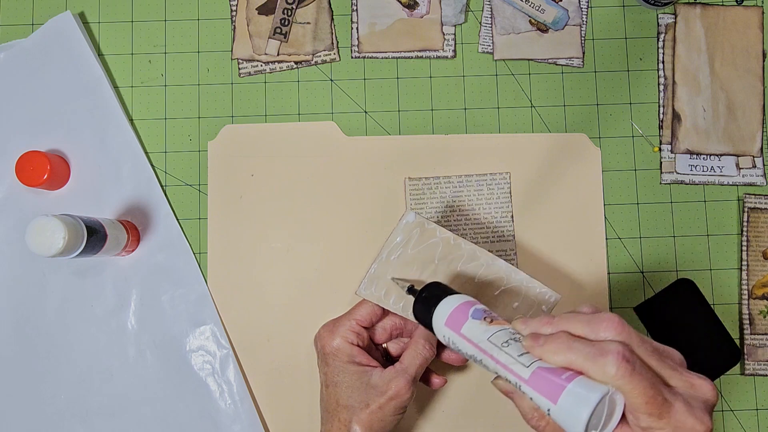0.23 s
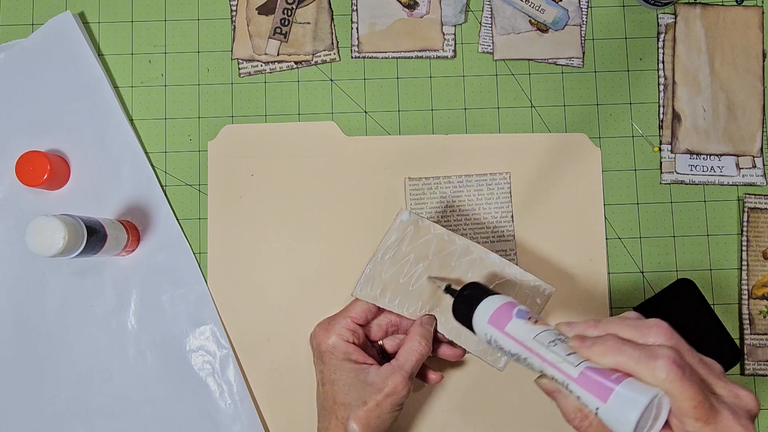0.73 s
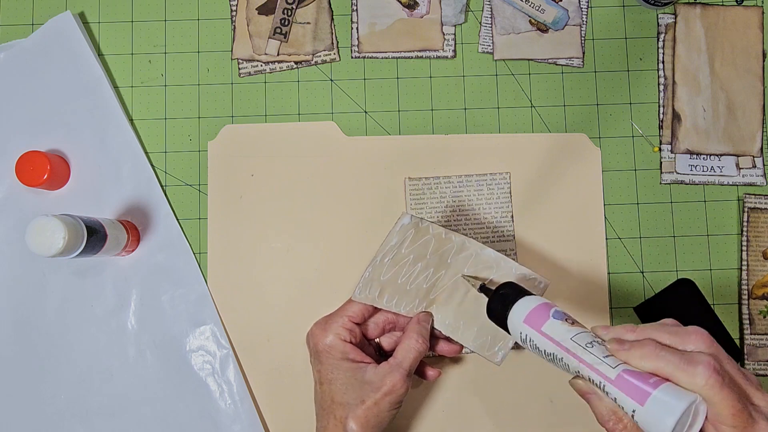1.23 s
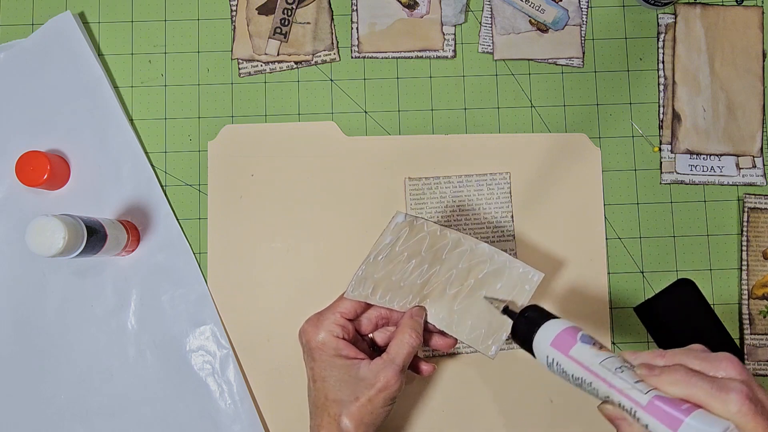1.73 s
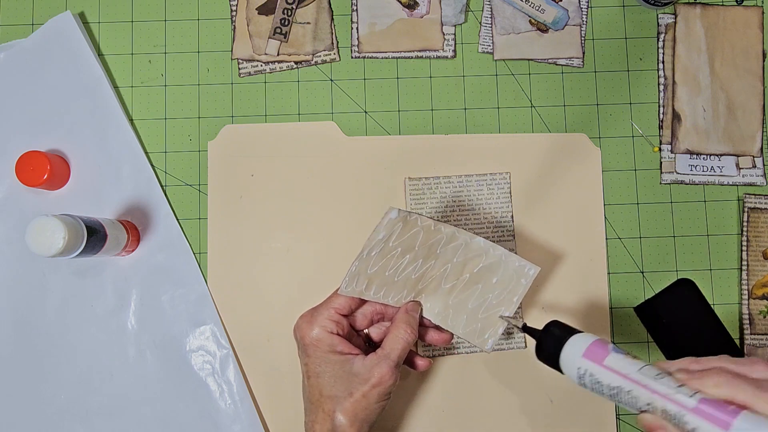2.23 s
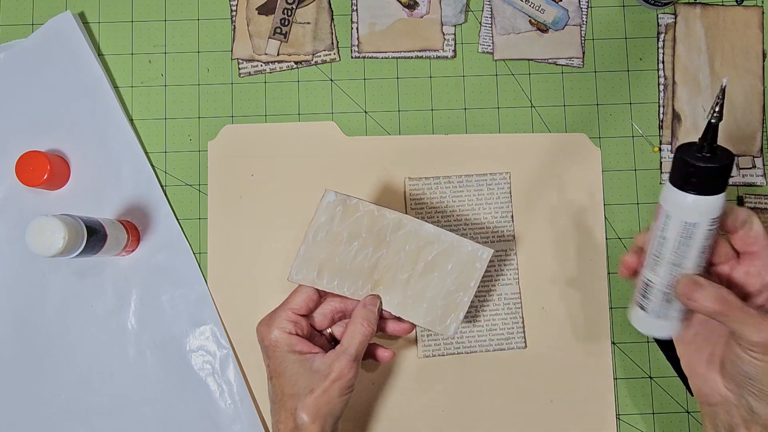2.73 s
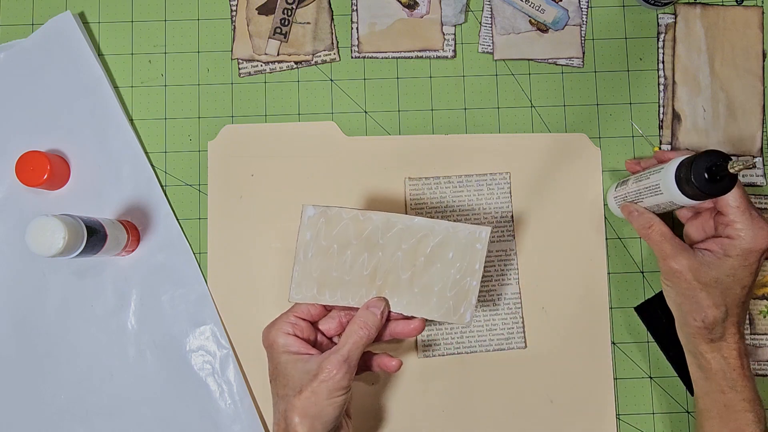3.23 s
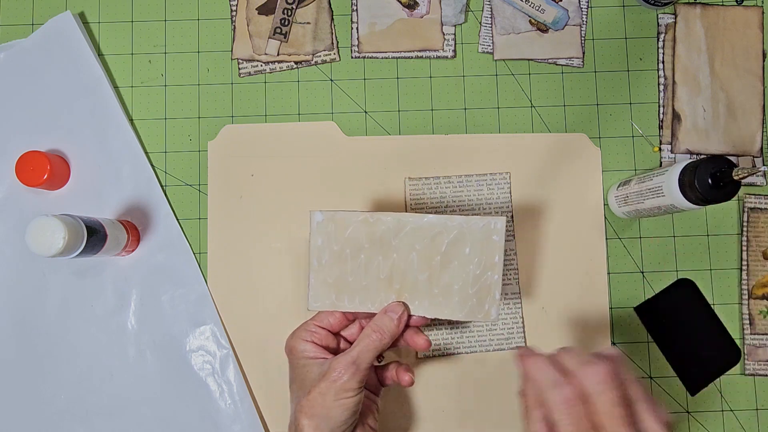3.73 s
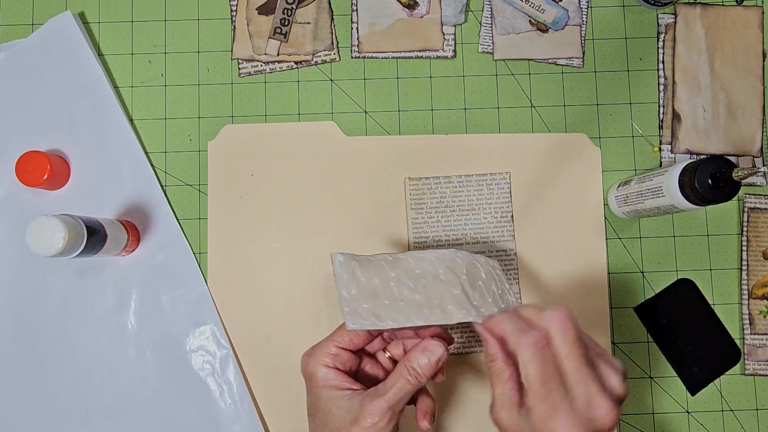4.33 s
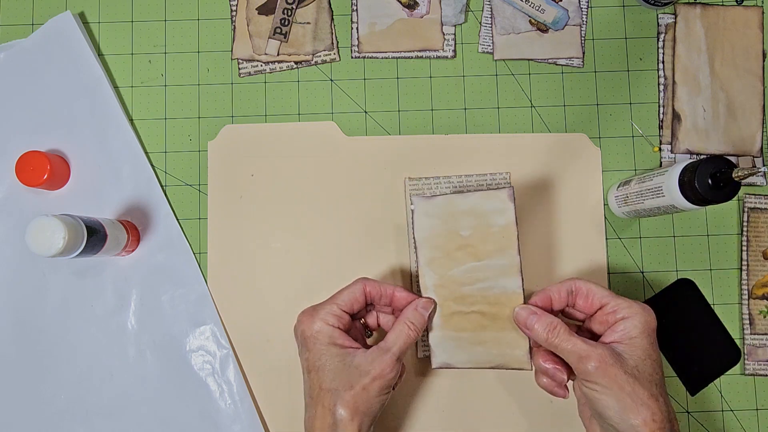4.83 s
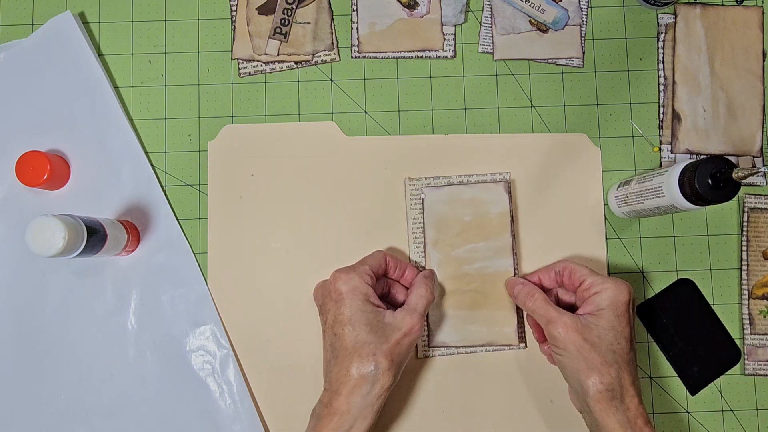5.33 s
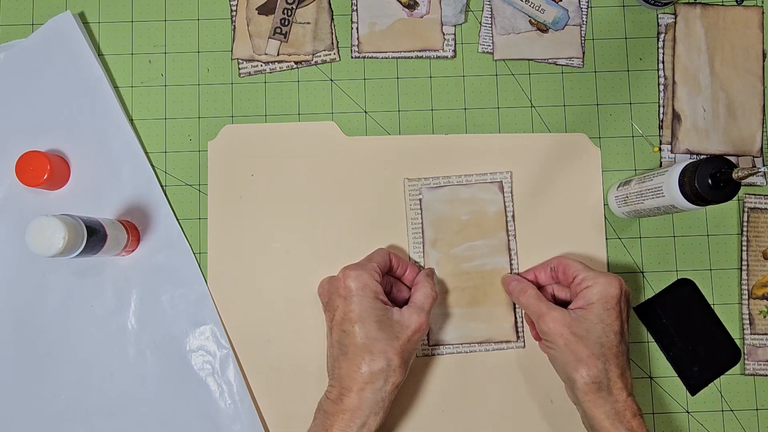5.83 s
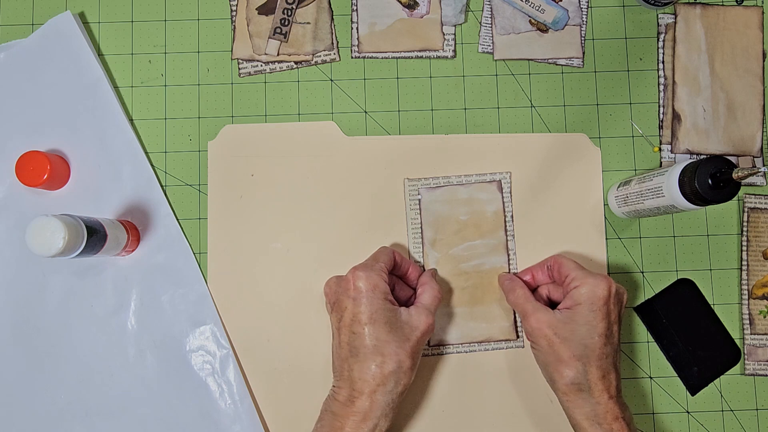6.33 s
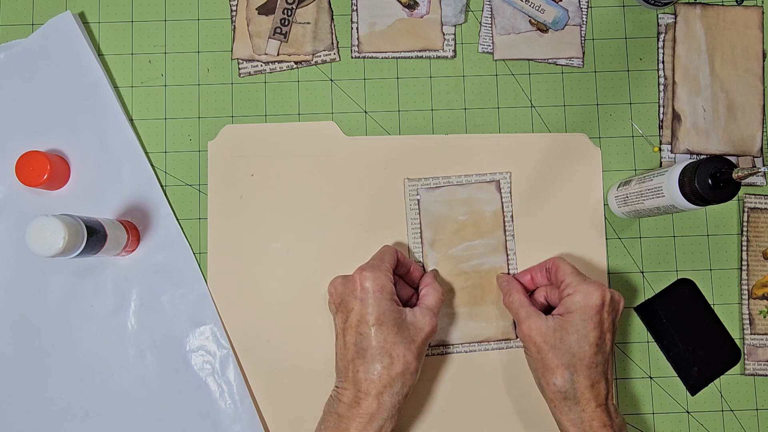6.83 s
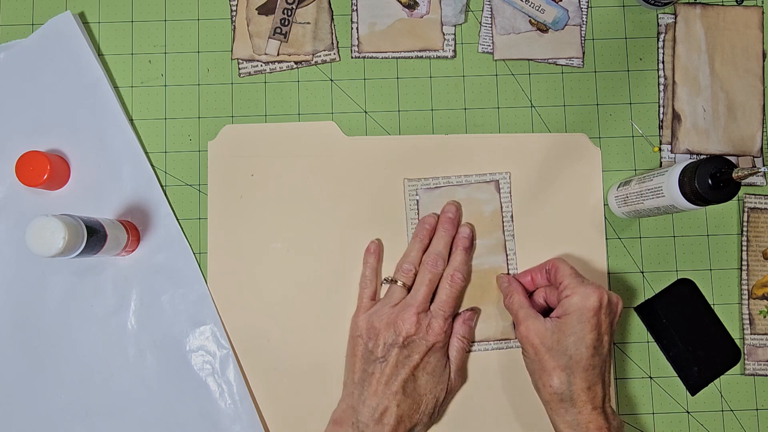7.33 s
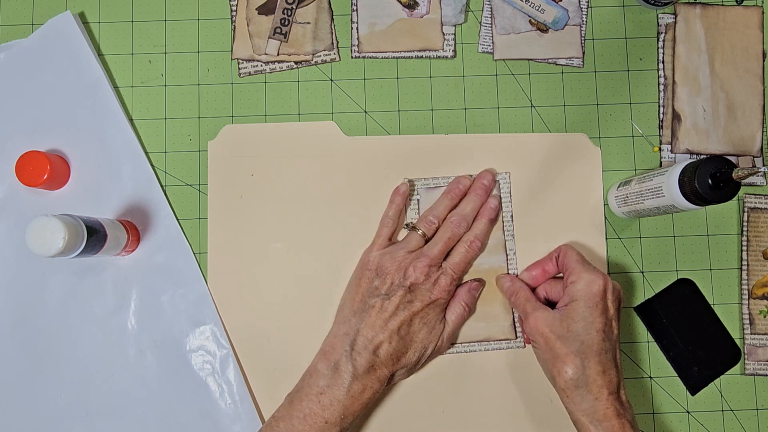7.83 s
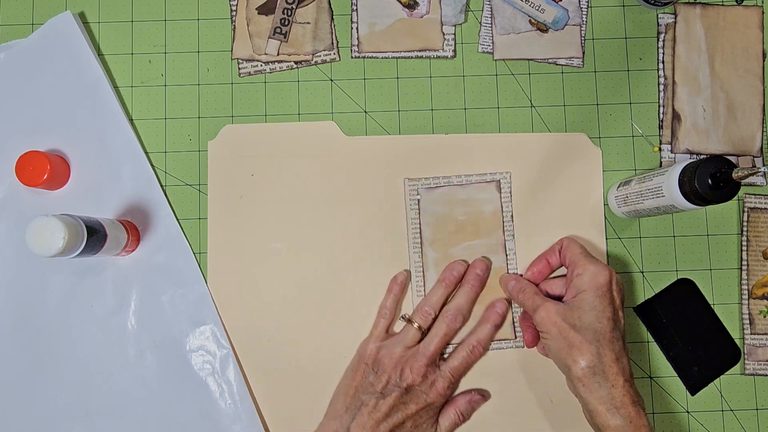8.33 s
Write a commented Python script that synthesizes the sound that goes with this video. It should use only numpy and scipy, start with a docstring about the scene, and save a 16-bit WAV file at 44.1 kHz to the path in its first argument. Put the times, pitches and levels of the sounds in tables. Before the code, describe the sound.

Rapid scratchy scribbling of a glue nozzle on stiff card, a bottle thudding down, small card ticks, then a palm hissing across paper.

```python
"""Over low rumble, thin air and a mains hum whose throb grows and later eases, a nozzle scribbles on a card.
Slips of friction drive the card's modes; the glue bottle is then stood on the table: plastic clack, modal thud.
Fingers turn the card with ticks (compact pulses), rustles and faint squeaks (resonated noise), and lay it on
its backing; a flat hand smooths it in two passes of hiss. Small room, close stereo microphones."""
import sys
import numpy as np
from scipy import signal
from scipy.fft import rfft, irfft
from scipy.io import wavfile
from scipy.ndimage import uniform_filter1d

SR = 44100
rng = np.random.default_rng(int(sys.argv[2]) if len(sys.argv) > 2 else 0)


def generate_wav(signal):
    """Clip the signal to [-1, 1] and save it as 16-bit WAV at the path in sys.argv[1]."""
    frames = np.transpose(np.atleast_2d(signal))
    scaled = np.clip(frames, -1, 1) * 32767
    pcm = np.round(scaled).astype(np.int16)
    wavfile.write(sys.argv[1], SR, pcm)


N = 379260
T = np.arange(N) / SR
HZ = np.maximum(np.arange(N // 2 + 1) * SR / N, 1)
SIDES = np.array([[1], [-1]])  # left, right

# All levels are relative.
# room rumble: f/Hz, level/dB
RUMBLE_SPECTRUM = [(12, -43), (27, -11.5), (35, -13), (47, 0), (60, -12), (78, -4), (97, 1.5), (112, -7),
                   (125, -12.5), (140, -14), (170, -25.5), (225, -19.5), (292, -21.5), (330, -36.5)]
# room air: f/Hz, level/dB
AIR_SPECTRUM = [(250, -9.5), (340, 0.5), (500, 1), (700, -4.5), (1000, -10.5), (1500, -13), (2000, -10),
                (2500, -18.5), (3200, -17.5), (5000, -25), (7500, -32), (10000, -41.5), (11500, -29.5),
                (13000, -36), (15500, -32.5)]
# rumble differing between sides: f/Hz, level/dB
RUMBLE_SIDE_SPECTRUM = [(25, 1.5), (100, 0), (300, -9.0)]
RUMBLE_DB, AIR_DB = -52.5, -75
# hum partials: f/Hz, level/dB
HUM_PARTIALS = [(120, -74.5), (186.5, -80), (240, -62.5), (360, -89)]
# depth of the hum's throb: t/s, share 0-1
HUM_THROB_DEPTH = [(0, 0), (3.2, 0.22), (4.6, 0.52), (8.6, 0.16)]
THROB_HZ = 5.3
# nozzle strokes, about nine a second: middle t/s, level/dB, treble level/dB, scratch resonance f/Hz
NOZZLE_STROKES = [(.056, -56.5, -4, 3750), (.172, -54, -2, 2600), (.282, -48, -1, 3780),
                  (.391, -52.5, -3, 3670), (.52, -48, -5.5, 3930), (.616, -59.5, -3.5, 2500),
                  (.731, -40, -11.5, 3920), (.843, -54, -8.5, 2390), (.949, -48.5, -2.5, 4170),
                  (1.059, -53.5, -1.5, 2500), (1.176, -44.5, 0.5, 2300), (1.309, -56, -4.5, 2380),
                  (1.419, -47.5, 1.5, 3040), (1.538, -49, -8, 2500), (1.652, -46.5, -3, 2470),
                  (1.758, -54, -7.5, 4370), (1.864, -46, -10, 6400), (1.966, -53, -13.5, 4700),
                  (2.086, -46, -8.5, 4930), (2.2, -64.5, -10.5, 4600)]
STROKE_HALF_S = 0.02
# card ringing: nominal f/Hz, width/Hz, level/dB
CARD_MODES = [(1100, 110, -2.5), (1327, 104, 13.5), (1670, 85, 0.5), (2230, 300, -36.5)]
# nozzle scratch on the fibres: f/Hz, level/dB
SCRATCH_SPECTRUM = [(1500, -6.5), (2400, -3.5), (3000, -7.5), (3800, -2), (4700, -4.5), (5700, -10),
                    (7000, -8.5), (8500, -12), (10500, -20.5), (12000, -19), (16000, -28)]
# card's bending mode where the tip works: t/s, f/Hz, level/dB
BENDING_MODE = [(0, 513, -10), (.4, 556, -8), (.72, 910, -10.5), (.85, 474, -7.5), (1.18, 890, -13.5),
                (1.42, 840, -5), (1.55, 580, -8.5), (1.76, 645, -9), (1.87, 910, -4)]
# nozzle, fingers and nails on the card, and at 3.023 s the glue bottle rocking: t/s, level/dB, knock f/Hz,
# width/octaves, snap level/dB, rasp 0-1
CARD_KNOCKS = [(.631, -37, 1180, 0.8, -26, 0.3), (.641, -34.5, 1250, 1.06, -13, 0.2),
               (.653, -45, 1660, 1.04, -6, .9), (1.198, -34, 1300, 0.48, -11, 0.35),
               (2.394, -47, 980, 0.88, -17, 0.22), (3.023, -56.5, 1430, 1.6, -3.5, .7),
               (3.357, -59, 1490, 0.3, -35, 0.27), (3.999, -46.5, 920, 0.76, -27, 0.17),
               (4.163, -62.5, 1100, 1.34, -7, 1), (4.193, -54, 785, 0.77, -27, .3),
               (6.109, -49, 1830, 0.57, -5.5, 0.05), (7.193, -44, 2520, 0.55, 6, 0.03),
               (7.71, -69, 1300, 0.94, -10, .6), (8.377, -68.5, 2010, .7, -1, .65)]
# ringing left by a knock: f/Hz, width/Hz, level/dB
KNOCK_RING_MODES = [(493, 140, -4.5), (1340, 140, -8), (2200, 150, -3)]
# snap of a usual knock; higher knocks snap higher by the power SNAP_RISE
SNAP_HZ, USUAL_KNOCK_HZ, SNAP_RISE, SNAP_OCTAVES = 4620, 1360, 0.38, 0.33
# card edge flicking past a fingertip: t/s, level/dB, centre f/Hz, snap level/dB
EDGE_FLICKS = [(.869, -64, 5500, -2), (2.424, -62.5, 2600, -2), (4.242, -57, 3000, -6),
               (4.937, -66, 2200, -14), (4.985, -61.5, 1900, -14.5), (5.4, -65, 4500, -2.5),
               (5.502, -70, 4200, -8), (6.758, -68.5, 6950, -13), (6.91, -67, 6360, -6),
               (7.177, -62, 7000, -5), (7.185, -58, 3700, -11), (7.851, -62, 4600, -5),
               (8.568, -52, 4380, -8)]
FLICK_OCTAVES, FLICK_RASP, FLICK_SNAP_HZ = 1, 0.89, 7930
# fingers shifting on the card: middle t/s, half length/s, level/dB, centre f/Hz
FINGER_BRUSHES = [(2.431, 0.031, -77, 5040), (2.61, .045, -82.5, 5970), (2.806, .12, -79, 500),
                  (2.934, .03, -71.5, 4450), (3.216, .032, -79, 2130), (3.977, .023, -82, 5500),
                  (4.066, .011, -77, 3500), (4.255, .011, -66, 8000), (4.321, 0.035, -74, 700),
                  (4.553, 0.13, -77, 520), (4.688, .014, -80.5, 4970), (4.804, .018, -70.5, 1680),
                  (4.943, 0.0094, -64.5, 3600), (5.105, .009, -71, 1900), (5.349, 0.0058, -68, 3270),
                  (6.914, 0.018, -77.5, 4500), (7.008, .022, -74, 4930), (7.768, 0.015, -76, 4960)]
# dry rustle: f/Hz, level/dB
RUSTLE_SPECTRUM = [(400, 18.5), (900, -1), (1300, 9), (2000, -0.5), (4500, -1.0), (7500, -3.0),
                   (10000, -9.0), (15000, -4)]
LANDING_S, LANDING_DB = 2.931, -32  # bottle
# table top modes: f/Hz, level/dB, t60/s
TABLE_MODES = [(78, -2, 0.22), (106, -2, 0.13), (169, 1.5, 0.058), (228, -2, 0.045), (306, -20, 0.046),
               (505, -14.5, 0.072), (890, -21, 0.057)]
# plastic rim's clack: f/Hz, level/dB
CLACK_SPECTRUM = [(400, 3), (900, 3), (1500, -5), (3300, 2), (7000, -14), (15000, -42)]
# hands bumping the table softly: t/s, level/dB
TABLE_BUMPS = [(3.02, -41), (4.232, -43), (4.57, -43), (4.785, -42.5), (4.918, -41.5), (6.109, -48),
               (7.192, -40.5)]
# skin squeaking on the card: middle t/s, half length/s, level/dB, f/Hz
SKIN_SQUEAKS = [(4.345, 0.03, -86, 2824), (4.6, 0.06, -84, 2860), (6.996, 0.011, -75.5, 2590)]
# flat hand lands, glides up the card, draws back, sets off again:
# start t/s, attack/s, end t/s, level/dB, change while gliding/(dB/s)
HAND_GLIDES = [(7.171, 0.028, 7.279, -52.5, 9), (7.31, .11, 7.685, -61, 9.5), (7.84, .015, 7.9, -64, 0),
               (7.865, 0.16, 8.345, -48.3, -10), (8.47, 0.033, 8.6, -64.5, 18)]
GLIDE_RELEASE_DB_PER_S = 235
# skin on paper: f/Hz, level/dB
RUB_SPECTRUM = [(900, -24), (1400, -15.5), (1850, -11.5), (2200, -6.5), (2900, -1.5), (3400, -1.5),
                (4200, 0.5), (6400, -0.5), (9000, -2.5), (10400, -7), (11800, -3), (15500, -8)]
# table murmur under the hand: f/Hz, level/dB
MURMUR_SPECTRUM = [(80, -1), (130, 10), (170, -16), (300, -27)]
# left microphone over right: f/Hz, level difference/dB
MICROPHONE_LEAN = [(150, 2), (500, 2.1), (1400, 2.0), (4400, -1.0), (8000, -3.5), (15000, -1.0)]
TOP_HZ = 15850


def amp(db):
    """Decibels to gain."""
    return 10 ** (np.asarray(db) / 20)


def unit(x):
    """Scale to rms 1."""
    return x / np.sqrt(np.mean(x ** 2) + 1e-30)


def colour(x, points):
    """Filter by a (Hz, dB) spectrum falling 30 dB per octave beyond its ends."""
    hz, db = np.transpose(points)
    octaves_beyond = np.maximum(np.log2(hz[0] / HZ), 0) + np.maximum(np.log2(HZ / hz[-1]), 0)
    gain_db = np.interp(np.log(HZ), np.log(hz), db) - 30 * octaves_beyond
    return irfft(rfft(x) * amp(gain_db), N)


def resonate(x, hz, width_hz):
    """Two-pole resonance with gain 1 at its centre."""
    return signal.lfilter(*signal.iirpeak(hz, hz / width_hz, SR), x)


def walk(rate_hz):
    """Smooth random wandering at rms 1."""
    k = int(SR / rate_hz)
    steps = np.repeat(rng.standard_normal(N // k + 1), k)
    return unit(uniform_filter1d(steps, k)[:N])


def friction(slips_per_s, spread_db, smooth):
    """Fibres catching and letting go: dense uneven slips over a smooth hiss."""
    happens = rng.random(N) < slips_per_s / SR
    strength = amp(spread_db * np.clip(rng.standard_normal(N), -2, 2))
    slips = happens * rng.standard_normal(N) * strength
    return unit(unit(slips) + smooth * rng.standard_normal(N))


def swell(s, half_s, edge=2.65):
    """Strength of one short movement: it gathers, holds and stops."""
    return 1 / (1 + np.abs((T - s) / (1.447 * half_s)) ** edge)


def impact(gain, size=1024):
    """Minimum-phase pulse of the given spectrum, with the energy of rms 1 lasting 4 ms."""
    cepstrum = irfft(np.log(gain / gain.max() + 1e-3))
    # fold onto positive time: the most compact causal pulse
    cepstrum[1:size // 2] *= 2
    cepstrum[size // 2 + 1:] = 0
    pulse = irfft(np.exp(rfft(cepstrum)))
    return pulse * np.sqrt(.004 * SR / np.sum(pulse ** 2))


def add(out, s, sound):
    """Mix a sound in at time s."""
    i = int(s * SR)
    out[i:i + len(sound)] += sound[:N - i]


def flex(x, share, t60_s):
    """Pass through the card's many short-lived upper modes, which differ with every grip and contact point."""
    t = T[:1024]
    modes = rng.standard_normal(len(t)) * amp(-60 * t / t60_s)
    share = np.clip(share, 0, 1)
    response = modes * np.sqrt(share / np.sum(modes ** 2))
    response[0] += np.sqrt(1 - share)
    return signal.fftconvolve(x, response)[:len(x)]


def travel(x, progress, share, t60_s):
    """The contact point slides along the card, so one set of upper modes gives way to another."""
    turn = np.clip(progress, 0, 1) * np.pi / 2
    before = unit(flex(x, share, t60_s))
    after = unit(flex(x, share, t60_s))
    return np.cos(turn) * before + np.sin(turn) * after


def background(rumble_side_db=-20, air_side_db=-3):
    """Low rumble, thin room air and a hum that throbs about five times a second."""
    rumble = unit(colour(rng.standard_normal(N), RUMBLE_SPECTRUM))
    rumble_side = unit(colour(rng.standard_normal(N), RUMBLE_SIDE_SPECTRUM))
    rumble = rumble + amp(rumble_side_db) * SIDES * rumble_side
    air, air_side = (unit(colour(rng.standard_normal(N), AIR_SPECTRUM)) for _ in range(2))
    air = air + amp(air_side_db) * SIDES * air_side
    depth = np.interp(T, *np.transpose(HUM_THROB_DEPTH))
    throb = 1 + depth * np.sin(2 * np.pi * THROB_HZ * T + 0.46 * walk(1.6))
    hum = np.zeros((2, N))
    for hz, db in HUM_PARTIALS:
        phase = 2 * np.pi * hz * T + .15 * walk(3.2) + 0.18 * SIDES
        hum += amp(db) * np.sqrt(2) * np.sin(phase)
    return amp(RUMBLE_DB) * rumble + amp(AIR_DB) * air + hum * throb


def nozzle(shift=0.032, edge_hz=850, press_db=-2.5, scratch_db=-3, side_db=-2.0,
           tip_db=-1, tip_width_hz=800, bite=3.8, fade=3):
    """Each stroke scrapes the card into ringing; its bending mode moves with the tip's place on the card."""
    grip = amp(1.86 * walk(70))  # the tip drags or runs on the wet glue
    catches = amp(1.9 * walk(450))  # ridges in the paper jolt ring and scratch together
    drag = friction(3500, 3.4, 0.25) * catches
    scratch, scratch_side = (colour(friction(2500, 2.0, 0.97) * catches, SCRATCH_SPECTRUM) for _ in range(2))
    ring_band = signal.butter(2, [edge_hz, 2600], "band", fs=SR, output="sos")
    ring_drive = signal.sosfilt(ring_band, drag)
    bend_s, *bending = np.transpose(BENDING_MODE)
    chances = rng.standard_normal((len(NOZZLE_STROKES), len(CARD_MODES)))
    out = np.zeros((2, N))
    for (s, db, treble_db, tip_hz), chance in zip(NOZZLE_STROKES, chances):
        bend_hz, bend_db = (np.interp(s, bend_s, column) for column in bending)
        span = slice(max(int((s - .15) * SR), 0), int((s + .15) * SR))
        progress = .5 + (T[span] - s) / (4 * STROKE_HALF_S)
        ring = sum(amp(g) * resonate(ring_drive[span], hz * (1 + shift * c), width_hz)
                   for (hz, width_hz, g), c in zip(CARD_MODES, chance))
        bend = resonate(resonate(drag[span], bend_hz, 0.5 * bend_hz), bend_hz, 0.5 * bend_hz)
        body = travel(ring, progress, share=0.6, t60_s=0.021)
        body = body + amp(bend_db) * travel(bend, progress, share=0.53, t60_s=0.031)
        # the tip bites quickly and lets go slowly
        body = body * swell(s, STROKE_HALF_S, edge=np.where(T < s, bite, fade))[span]
        # the whole sheet radiates the scratch, so it reaches the two microphones unlike
        mid, side = (travel(x[span], progress, share=0.78, t60_s=0.0054) for x in (scratch, scratch_side))
        fibres = mid + amp(side_db) * side * SIDES
        fibres = fibres + amp(tip_db) * resonate(fibres, tip_hz, tip_width_hz)
        fibres = fibres * swell(s, STROKE_HALF_S, edge=3.44)[span]
        stroke = body + amp(treble_db + scratch_db) * fibres
        out[:, span] += amp(db + press_db) * grip[span] * stroke
    return out


def tick(knock_hz, octaves, snap_db, snap_hz, rasp, size=1024, knock_t60_s=0.014, snap_t60_s=0.0084):
    """One contact: a damped knock with a sharp snap on top; a dragging contact spreads both into a rasp."""
    hz = np.maximum(np.arange(size // 2 + 1) * SR / size, 1)

    def pulse(centre_hz, octaves):
        """Impact with a bell-shaped spectrum."""
        return impact((1 + (np.log2(hz / centre_hz) / octaves) ** 2 / 4) ** -3)

    knock = flex(pulse(knock_hz, octaves), rasp, knock_t60_s)
    snap = flex(pulse(snap_hz, SNAP_OCTAVES), (1 + rasp) / 2, snap_t60_s * (.5 + rasp))
    return knock + amp(snap_db) * snap


def ticks(lag_s=.00064, flick_t60_s=.034, flick_snap_t60_s=.011):
    """Knocks set the card ringing; flicks of its edge are thin and raspy."""
    out = np.zeros(N)
    for s, db, hz, octaves, snap_db, rasp in CARD_KNOCKS:
        snap_hz = SNAP_HZ * (hz / USUAL_KNOCK_HZ) ** SNAP_RISE
        blow = tick(hz, octaves, snap_db, snap_hz, rasp)
        ring = sum(amp(g) * resonate(blow, mode_hz, width_hz) for mode_hz, width_hz, g in KNOCK_RING_MODES)
        add(out, s + lag_s, amp(db) * (blow + ring))
    for s, db, hz, snap_db in EDGE_FLICKS:
        flick = tick(hz, FLICK_OCTAVES, snap_db, FLICK_SNAP_HZ, FLICK_RASP,
                     knock_t60_s=flick_t60_s, snap_t60_s=flick_snap_t60_s)
        add(out, s + lag_s, amp(db) * flick)
    return out


def fingers(relative_width=1.08):
    """Fingertips slide a little on the card with a faint dry rustle."""
    grain = colour(friction(1300, 3.1, 0.36), RUSTLE_SPECTRUM)
    out = np.zeros(N)
    for s, half_s, db, hz in FINGER_BRUSHES:
        span = np.abs(T - s) < 6 * half_s
        rustle = flex(resonate(grain[span], hz, relative_width * hz), share=0.62, t60_s=0.035)
        out[span] += amp(db) * swell(s, half_s)[span] * unit(rustle)
    return out


def bottle(clack_db=-10, clack_t60_s=0.033, push_s=0.0013):
    """The plastic rim clacks down, then the bottle's weight follows and the table top thuds."""
    t = T[:SR // 2]
    thud = sum(amp(db - 60 * t / t60_s) * np.sin(2 * np.pi * hz * t) for hz, db, t60_s in TABLE_MODES)
    thud = thud * (1 - np.exp(-t / push_s))
    clack = unit(colour(rng.standard_normal(N), CLACK_SPECTRUM))[:len(t)]
    out = np.zeros(N)
    add(out, LANDING_S + 0.0011, amp(LANDING_DB) * thud)
    add(out, LANDING_S - .001, amp(LANDING_DB + clack_db - 60 * t / clack_t60_s) * clack)
    return out


def bumps(push_s=0.0078):
    """A soft, slow push stirs mainly the table's lowest modes."""
    t = T[:SR // 2]
    thud = sum(amp(db - 60 * t / t60_s) * np.sin(2 * np.pi * hz * t) / (1 + (hz * push_s) ** 4)
               for hz, db, t60_s in TABLE_MODES)
    out = np.zeros(N)
    for s, db in TABLE_BUMPS:
        add(out, s, amp(db) * thud * (1 - np.exp(-t / push_s)))
    return out


def squeaks(width_hz=130):
    """A pinching fingertip slips at an almost steady rate: noise through two narrow resonances."""
    slips = rng.standard_normal(N)
    out = np.zeros(N)
    for s, half_s, db, hz in SKIN_SQUEAKS:
        squeak = resonate(resonate(slips, hz, width_hz), hz, 2 * width_hz)
        out += amp(db) * swell(s, half_s) * unit(squeak)
    return out


def glide(start_s, attack_s, end_s, db, db_per_s):
    """Strength of one glide: it gathers, drifts steadily in dB and dies away."""
    gather = np.clip((T - start_s) / attack_s, 0, 1)
    held_s = np.clip(T, start_s, end_s) - start_s
    release_db = GLIDE_RELEASE_DB_PER_S * np.maximum(T - end_s, 0)
    return np.sin(gather * np.pi / 2) ** 2 * amp(db + db_per_s * held_s - release_db)


def palm(side_db=-1, weight_db=-12, resting_db=-80):
    """Skin gliding over paper: fine hiss from the hand's whole width, a low murmur of the table under it."""
    mid, side = (unit(colour(friction(9000, 2.8, 1), RUB_SPECTRUM)) for _ in range(2))
    hiss = mid + amp(side_db) * side * SIDES
    murmur = unit(colour(rng.standard_normal(N), MURMUR_SPECTRUM))
    resting = amp(resting_db) * (T > HAND_GLIDES[0][0])  # once down, the hand is never quite still
    motion = np.maximum(sum(glide(*row) for row in HAND_GLIDES), resting)
    unevenness = amp(0.52 * walk(36) + .5 * walk(250))
    return (hiss + amp(weight_db) * murmur) * motion * unevenness


def room(x, near_db, wet_db, near_t60_s=0.06, t60_s=0.15, scatter_hz=2200, dull_hz=7000):
    """Direct sound, scatter from table and hands, then the room; each microphone hears its own treble."""
    t = T[:SR // 2]

    def tail(decay_s, delay_s):
        """Decaying noise, shared between sides in the lows and separate in the highs."""
        shared, own = rng.standard_normal(len(t)), rng.standard_normal((2, len(t)))
        lows = signal.lfilter(*signal.butter(1, scatter_hz, fs=SR), shared)
        highs = signal.lfilter(*signal.butter(1, scatter_hz, "high", fs=SR), own)
        h = (lows + highs) * amp(-60 * t / decay_s) * (t > delay_s)
        return h / np.sqrt(np.sum(h ** 2) / 2)

    far = signal.lfilter(*signal.butter(1, dull_hz, fs=SR), tail(t60_s, 0.006))
    response = amp(near_db) * tail(near_t60_s, 0.0004) + amp(wet_db) * far
    return x + signal.fftconvolve(np.atleast_2d(x), response, axes=1)[:, :N]


def from_left(both, delay_samples=2):
    """A source left of centre reaches the right microphone slightly late."""
    return np.array([both[0], np.roll(both[1], delay_samples)])


def microphones(both):
    """The left microphone favours lows and middle, the right one the treble."""
    lean_hz, lean = np.transpose(MICROPHONE_LEAN)
    lean_db = np.interp(np.log(HZ), np.log(lean_hz), lean)
    return irfft(rfft(both) * amp(np.array([lean_db, -lean_db]) / 2), N)


def scene():
    """Scribbling and handling through the room, the hand's hiss direct, over the background."""
    scribble = from_left(room(nozzle(), near_db=-12.5, wet_db=-9.5, scatter_hz=890))
    contacts = ticks() + fingers() + bottle() + bumps() + squeaks()
    handling = room(contacts, near_db=-3.5, wet_db=-7.0, near_t60_s=0.039, t60_s=0.16, scatter_hz=1490)
    return microphones(scribble + handling + amp(-3.5) * palm()) + background()


def record(dry):
    """The recorder cuts the top with a steep low-pass."""
    return signal.sosfilt(signal.ellip(10, .2, 70, TOP_HZ, fs=SR, output="sos"), dry)


dry = scene()
out = record(dry)
generate_wav(out)
```